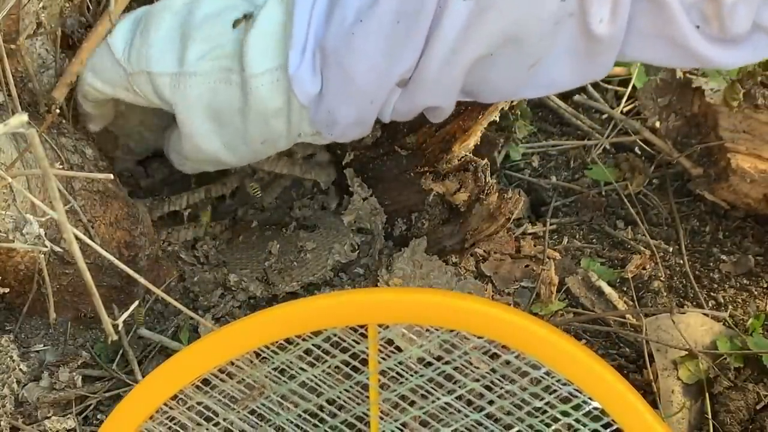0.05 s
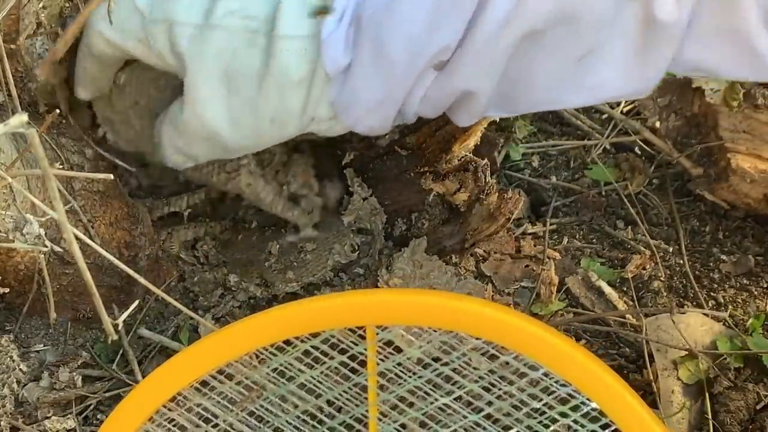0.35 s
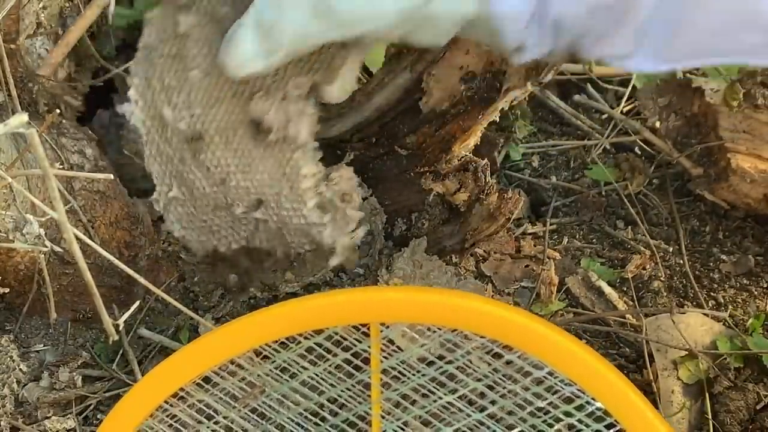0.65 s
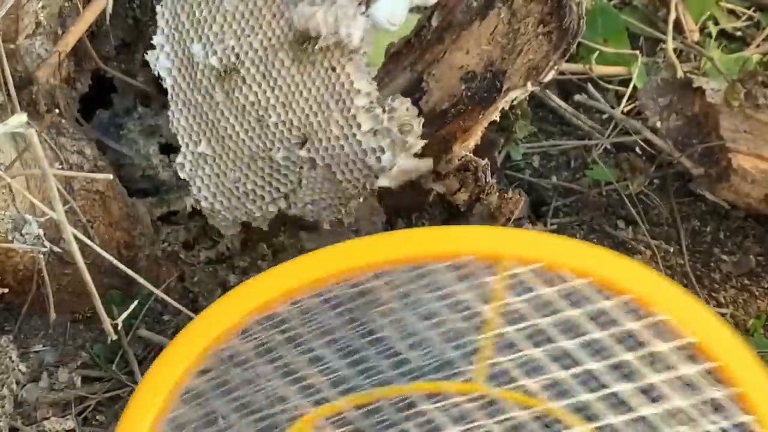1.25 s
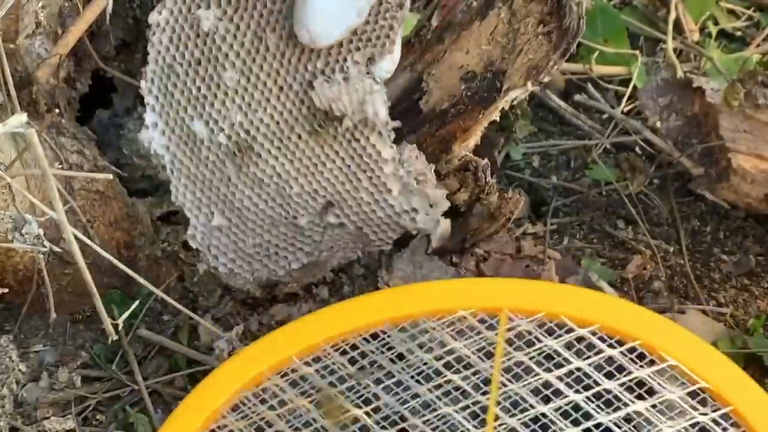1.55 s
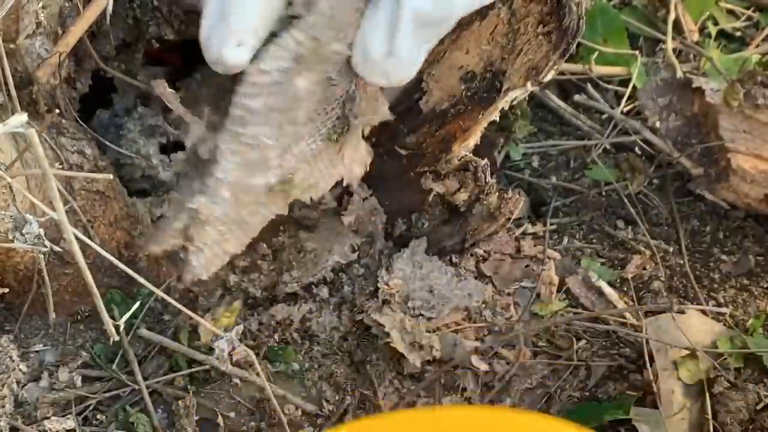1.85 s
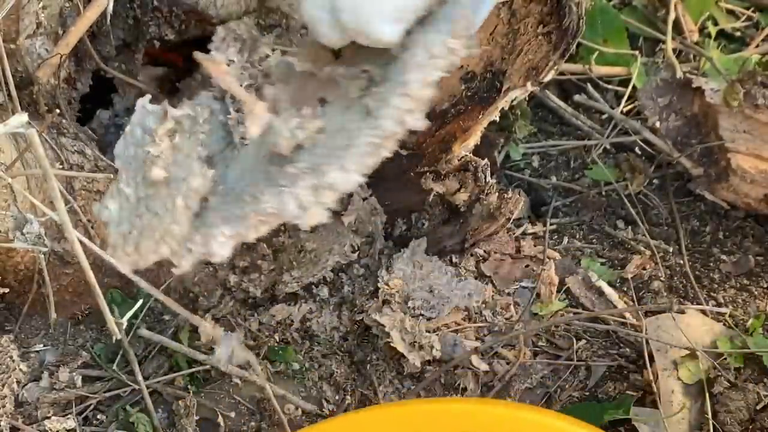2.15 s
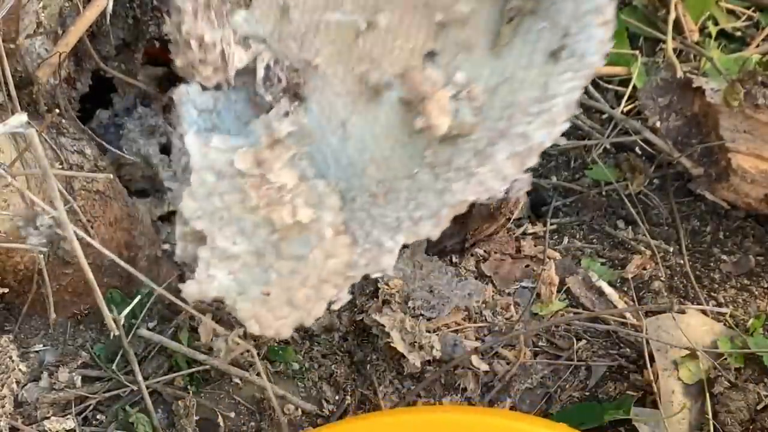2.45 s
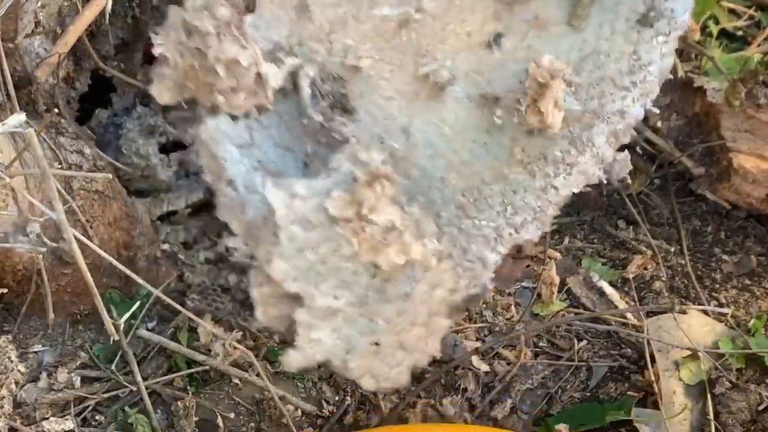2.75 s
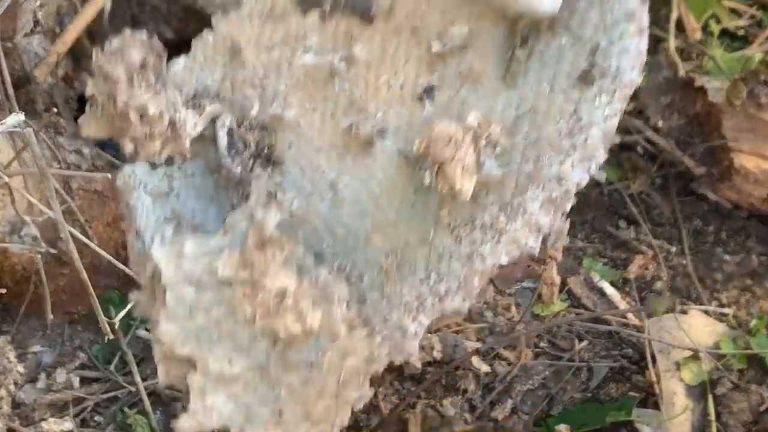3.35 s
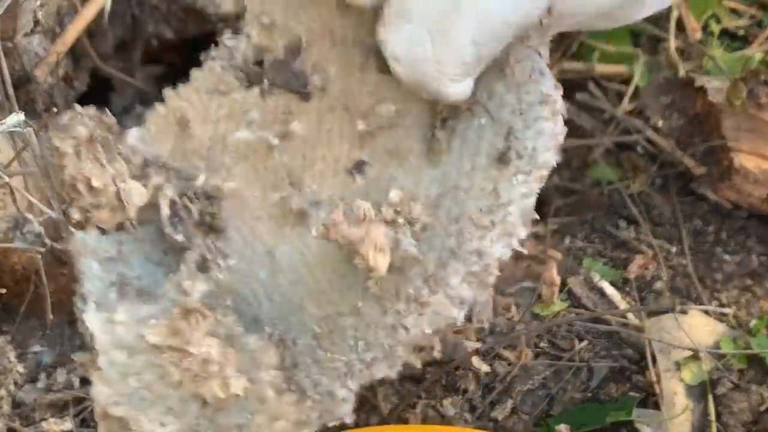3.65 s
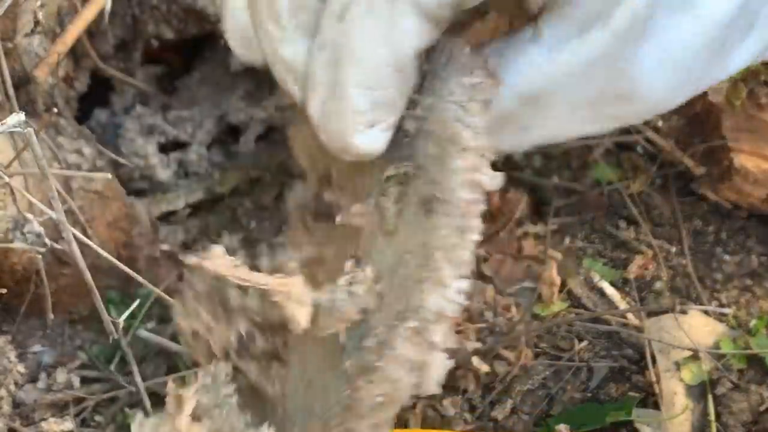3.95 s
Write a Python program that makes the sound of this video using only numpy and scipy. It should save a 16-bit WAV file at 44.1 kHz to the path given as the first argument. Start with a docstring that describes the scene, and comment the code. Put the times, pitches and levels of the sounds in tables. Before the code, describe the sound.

Low buzzing of many wasps outdoors, with close rustles and cracks of their handled paper nest.

```python
"""A paper wasp comb, close to the microphone, as a gloved hand pulls it from a hollow stump and turns it over.
Its dry fibres rustle and crack, and the glove scrapes and squeaks on it. Around it the wing beats of
many wasps drone, ring in the hollow and swell as the comb moves; more wasps hum farther off.
Behind them lie a deep rumble, soft air and a faint, distant bird.
The stereo microphone's two ports hear the paper a moment apart, the right one first."""
import sys
import numpy as np
from scipy import signal
from scipy.fft import rfft, irfft
from scipy.io import wavfile

SR = 44100
rng = np.random.default_rng(int(sys.argv[2]) if len(sys.argv) > 2 else 0)


def generate_wav(sig):
    """Save sig (samples, or channels by samples) to the path in sys.argv[1] as 16-bit PCM at SR."""
    pcm = np.round(np.clip(np.atleast_2d(sig).T, -1, 1) * 32767).astype(np.int16)
    wavfile.write(sys.argv[1], SR, pcm)


N = 176400
T = np.arange(N) / SR
HZ = np.fft.rfftfreq(N, 1 / SR)

# Rumble and air around the stump (time [s], level [dB])
RUMBLE_LEVEL = [(0,-32.5),(2.2,-31.5),(2.6,-33.5)]
AIR_LEVEL = [(0,-52.5),(.55,-48.5),(.78,-54),(.97,-50),(1.7,-48.5),(2.5,-53.5),(3.97,-52)]
# Their spectra (frequency [Hz], relative level [dB])
RUMBLE_COLOUR = [(8,-36),(20,-3),(42,-9),(62,3.5),(105,-8.5),(190,-25),(300,-31),(700,-79.5)]
AIR_COLOUR = [(60,-23.5),(200,2),(350,2),(750,-7.5),(1300,-16.5),(4000,-38),(16000,-58)]
# Notes of a distant bird (time [s], length [s], pitch [Hz], level [dB])
BIRD_NOTES = [(2.76,.16,2580,-72.5),(2.8,.07,2950,-75),(2.93,.06,2560,-70),(2.995,.055,2760,-71)]

# Wasps farther off (time [s], level [dB])
FAR_HUM_LEVEL = [(0,-83),(1.38,-95),(1.54,-49.5),(1.8,-55.5),(2.5,-68.5),(3.0,-54.5),(3.3,-52),(3.97,-58.5)]
# Wasps at the stump (time [s], hollow hum level [dB], low hum level [dB])
NEAR_HUM_LEVELS = [(0,-60,-53.5),(.2,-51.5,-51.5),(.33,-63,-53.5),(.48,-45,-45),(.64,-50.5,-47.5),(.82,-56.5,-50),(.93,-44.5,-52),(1.02,-42,-50),(1.12,-53,-46.5),(1.33,-55.5,-47),(1.55,-47.5,-41),(1.74,-43,-43.5),(1.99,-47.5,-43),(2.14,-53.5,-48),(2.58,-66.5,-48.5),(3.97,-75,-48)]
# Spectra of the far, low and hollow hums (frequency [Hz], relative level [dB])
FAR_HUM_COLOUR = [(250,-26),(450,4),(770,2.5),(990,-1.5),(1200,-20.5),(2500,-51)]
LOW_HUM_COLOUR = [(100,-38.5),(195,-20),(235,5),(298,4.5),(365,-5),(560,-29.5),(1500,-62)]
HOLLOW_HUM_COLOUR = [(300,-45),(560,-17.5),(690,-2),(785,-5),(870,-23.5),(1200,-40),(2500,-52)]
# The hollow's resonance, sinking as the comb comes out (time [s], frequency [Hz])
HOLLOW_RESONANCE = [(.7, 700), (1.3, 674)]

# Glove rubs that ring a patch of comb (time [s], length [s], resonance [Hz], width [Hz], level [dB])
GLOVE_RUBS = [(0.185,.09,7900,1100,-53.5),(0.44,.055,4200,220,-62.5),(0.955,.06,3000,1800,-71),(1.13,.075,4700,2400,-61),(1.22,.07,4700,2000,-61),(2.305,.055,4700,900,-74),(3.57,.045,1600,1300,-59),(3.885,.04,4400,1800,-67)]
# Glove scrapes on the paper (time [s], length [s], level [dB], body offset [dB])
GLOVE_SCRAPES = [(0.0,0.091,-52,-30),(0.165,0.21,-50,-13),(0.69,0.13,-50,-15.5),(0.912,.13,-48,-14.5),(1.772,0.23,-55,-12),(2.098,0.036,-51,-21),(2.156,0.13,-58.5,-15),(3.11,0.34,-58,-13.5),(3.567,0.055,-51.5,-16),(3.628,0.11,-60,-15.5),(3.884,0.057,-70,-5)]
# Steady rustle, close up (time [s], snap level [dB], body drive [dB])
RUSTLE_LEVELS = [(0.0,-42,-57.5),(0.13,-59.5,-69.5),(0.34,-53.5,-66),(0.87,-55.5,-74.5),(1.02,-53.5,-67.5),(1.35,-63,-74.5),(2.09,-64.5,-71),(2.46,-70,-85),(2.55,-64,-73.5),(2.8,-78.5,-82),(3.03,-69,-74),(3.3,-74,-74.5),(3.53,-74,-84),(3.97,-72.5,-84.5)]
# Cracks of the comb (time [s], strength [dB], knock offset [dB], ring [Hz])
COMB_CRACKS = [(0.0144,-45,7,1300),(0.1394,-50,-3,3300),(0.2745,-46,5,1250),(0.2835,-32,-14,3000),(0.585,-39,-20,3000),(0.7362,-39,-2,2700),(0.7474,-38,-14,4500),(0.781,-31,-11,4400),(0.9455,-42,2,1150),(0.9825,-41,-4,3300),(1.0685,-41,-16,3000),(1.284,-40,-18,4000),(1.806,-49,-4,4400),(1.8675,-35,1,1750),(1.9298,-39,-13,2500),(2.1155,-34,-11,2300),(2.5135,-43,-16,4200),(2.542,-43,-18,4000),(2.551,-30,-23,3700),(2.6054,-38,-21,4500),(2.689,-46,-16,4000),(2.8275,-49,-22,4000),(2.9212,-49,-14,4000),(2.9652,-48,-17,4000),(3.032,-45,-12,2800),(3.197,-38,-20,3000),(3.2728,-39,-22,4000),(3.3189,-33,-11,5800),(3.461,-40,-14,5200),(3.5925,-39,-3,1150),(3.6729,-31,-24,3000)]
# Spectra of fibre snaps, the paper's body and crack bursts (frequency [Hz], relative level [dB])
SNAP_COLOUR = [(1000, -44), (4000, -15), (6800, -8.5), (8400, 1), (10500, -3), (12500, 1.5), (14300, 7.5),
               (15100, -3), (16000, -27)]
BODY_COLOUR = [(200,-38),(700,12),(1400,10.5),(2300,8.5),(4400,5),(6500,6.5),(10000,-25)]
BURST_COLOUR = [(1500, -46), (5000, -22), (8500, -1.5), (12000, 5), (14500, 9), (16000, -16)]


def amp(db):
    """Decibels to gain."""
    return 10 ** (np.asarray(db) / 20)


def unit(x):
    """Scales to rms 1."""
    return x / np.sqrt(np.mean(x ** 2) + 1e-20)


def curve(table, column=1):
    """Gain over time from one dB column of a table."""
    rows = np.array(table)
    return amp(np.interp(T, rows[:, 0], rows[:, column]))


def colour(x, points):
    """Causal filter of unit power gain with the given spectrum."""
    hz, db = np.transpose(points)
    gain = unit(amp(np.interp(np.log(HZ + 1), np.log(hz), db)))
    log_gain = np.log(np.concatenate([gain, gain[-2:0:-1]]))
    minimum_phase = np.exp(np.conj(signal.hilbert(log_gain)))[:len(HZ)]
    return irfft(rfft(x) * minimum_phase, N)


def drift(hz):
    """Random wander of rms 1, up to about the given rate."""
    return unit(irfft(rfft(rng.standard_normal(N)) * np.exp(-(HZ / hz) ** 2), N))


def resonate(x, hz, width_hz):
    """A resonance of gain 1 that can follow a curve."""
    turn = np.exp(2j * np.pi * np.cumsum(hz * np.ones(x.shape[-1])) / SR)
    pole = np.exp(-np.pi * width_hz / SR)
    return 2 * (turn * signal.lfilter([1 - pole], [1, -pole], x / turn)).real


def add(mix, start, sound):
    """Mixes a sound in at a time in seconds."""
    part = mix[max(round(start * SR), 0):][:len(sound)]
    part += sound[:len(part)]


def spread(mid, side, width, left_db):
    """A stereo pair from a shared and an opposed part."""
    return unit(np.array([(mid + width * side) * amp(left_db), mid - width * side]))


def ports(x, delay_s=.000259):
    """Sound from the comb reaches the microphone's right port first."""
    left = irfft(rfft(x) * np.exp(-2j * np.pi * HZ * delay_s), N)
    return np.array([left, x])


def ground_scatter(x, decay_s=0.0079):
    """Brief reflections off the stump and the litter, different at each port."""
    t = np.arange(SR // 8) / SR
    taps = rng.standard_normal((2, len(t))) * np.exp(-t / decay_s) * (t > .002)
    return signal.fftconvolve(x[None], taps / np.linalg.norm(taps[0]), axes=1)[:, :N]


def outdoors():
    """The bed of the place: a deep rumble, nearly alike at both ports, and wide, soft air."""
    noise = rng.standard_normal((4, N))
    rumble = unit(colour(spread(*noise[:2], width=0.053, left_db=0.25), RUMBLE_COLOUR))
    air = colour(spread(*noise[2:], width=1.26, left_db=1.5), AIR_COLOUR)
    flutter = amp(1.3 * drift(25))
    return rumble * curve(RUMBLE_LEVEL) + air * flutter * curve(AIR_LEVEL)


def bird(blur_hz=200):
    """Twittering whistles, blurred by distance."""
    out = np.zeros(N)
    for start, length, hz, db in BIRD_NOTES:
        progress = np.clip((T - start) / length, 0, 1)
        phase = 2 * np.pi * hz * T
        whistle = unit(drift(blur_hz) * np.cos(phase) + drift(blur_hz) * np.sin(phase))
        out += amp(db) * np.sqrt(abs(np.sin(np.pi * progress))) * whistle
    return out * unit(amp(0.83 * drift(37)))


def wings(count=7, centre_hz=106.48, detune=.14, wander=.025, roughness=0.35):
    """Several wasps, each a wavering train of wing beats with a puff of air on every beat."""
    out = np.zeros(N)
    for offset in np.linspace(-1, 1, count):
        hz = centre_hz * (1 + detune * offset + wander * drift(5) + 0.01982 * drift(59.14))
        turns = np.cumsum(hz) / SR + rng.random()
        beats = unit(np.diff(np.floor(turns), prepend=0))
        puffs = unit(np.exp(-(turns % 1) / 0.22) * rng.standard_normal(N))
        out += (beats + roughness * puffs) * amp(2.94 * drift(8.2))
    return unit(out - out.mean())


def swarm(ring_db=5):
    """Wing beats drone nearby on the left, ring in the hollow, and hum farther off on the right."""
    mid, side = wings(), wings()
    low = colour(spread(mid, side, width=0.21, left_db=6.5), LOW_HUM_COLOUR)
    inside = spread(mid, side, width=0.37, left_db=-0.5)
    hollow_hz = np.interp(T, *np.transpose(HOLLOW_RESONANCE))
    ring = resonate(inside, hollow_hz, width_hz=15.3)
    hollow = colour(inside + amp(ring_db) * ring, HOLLOW_HUM_COLOUR)
    far = colour(spread(wings(), wings(), width=0.67, left_db=-4), FAR_HUM_COLOUR)
    near = unit(low) * curve(NEAR_HUM_LEVELS, column=2) + unit(hollow) * curve(NEAR_HUM_LEVELS)
    return near + unit(far) * curve(FAR_HUM_LEVEL)


def fibres(per_s, size_db, clump_db):
    """Tiny snaps of paper fibres, uneven in size and swelling in clumps."""
    sizes = amp(size_db * np.minimum(rng.exponential(1, N), 4)) * rng.choice([-1, 1], N)
    breaks = rng.random(N) < per_s / SR
    return unit(sizes * breaks * amp(clump_db * drift(49)))


def rubs():
    """Slips of the glove excite one patch of the comb at a time; a narrow resonance squeaks."""
    slips = np.array([fibres(per_s=3000, size_db=3, clump_db=1.5) for _ in range(2)])
    out = np.zeros((2, N))
    for start, length, hz, width_hz, db in GLOVE_RUBS:
        span = slice(round(start * SR), round((start + length) * SR))
        mid, side = resonate(resonate(slips[:, span], hz, width_hz), hz, width_hz)
        arch = np.sin(np.linspace(0, np.pi, len(mid)))
        out[:, span] += amp(db) * arch * spread(mid, side, width=0.6, left_db=0)
    return out


def scrapes(skew=0.83):
    """Envelopes of the glove's scrapes: each a quick swell and a slower fall."""
    snap, body = np.zeros((2, N))
    for start, length, db, body_db in GLOVE_SCRAPES:
        arch = np.sin(np.pi * np.linspace(0, 1, round(length * SR)) ** skew)
        add(snap, start, amp(db) * arch)
        add(body, start, amp(db + body_db) * arch)
    return snap, body


def crinkles(count=11, decay_cycles=1.28):
    """Cell walls of many sizes buckle in clumps, each ringing briefly, so the colour keeps shifting."""
    t = np.arange(SR // 80) / SR
    out = np.zeros(N)
    for hz in np.geomspace(1000, 7500, count):
        clicks = fibres(per_s=450, size_db=4.2, clump_db=3.5)
        ring = np.sin(2 * np.pi * hz * t) * np.exp(-t * hz / decay_cycles)
        out += np.sqrt(hz) * unit(signal.oaconvolve(clicks, ring)[:N])
    return unit(out)


def rustle():
    """Handled paper, close up: the bright snap arrives mostly direct, the duller body mostly scattered."""
    scrape_snap, scrape_body = scrapes()
    grain = fibres(per_s=5000, size_db=5, clump_db=2.5)
    snap = colour(grain * np.hypot(curve(RUSTLE_LEVELS), scrape_snap), SNAP_COLOUR)
    body = colour(crinkles() * np.hypot(curve(RUSTLE_LEVELS, column=2), scrape_body), BODY_COLOUR)
    return ports(snap + amp(-6.5) * body) + ground_scatter(amp(-9) * snap + amp(2.5) * body)


def cracks(snap_s=0.00069, crumble_s=.01, crumble_db=-19, ring_s=.0009):
    """Fibres break in a bright burst and crumble on; a woody, ringing knock hits both ports alike."""
    snap, knock, ring = np.zeros((3, N))
    t = np.arange(SR // 10) / SR
    burst = np.exp(-t / snap_s) + amp(crumble_db) * np.exp(-t / crumble_s)
    for start, db, knock_db, hz in COMB_CRACKS:
        onset = start + .001
        knock_gain = amp(db + knock_db - 2)
        add(snap, onset, amp(db - 1) * burst)
        add(knock, onset, knock_gain * burst)
        add(ring, onset, knock_gain * np.sin(2 * np.pi * hz * t) * np.exp(-t / ring_s))
    bright = colour(snap * rng.standard_normal(N), BURST_COLOUR)
    woody = ring + amp(-2.5) * colour(knock * rng.standard_normal(N), BODY_COLOUR)
    return ports(bright) + woody + amp(-10) * ground_scatter(bright + woody)


def scene():
    """Everything that reaches the microphone beside the stump."""
    return outdoors() + swarm() + rustle() + rubs() + cracks() + bird()


def record(dry, edge_hz=16100):
    """The recorder's band limit cuts off the highest treble."""
    lowpass = signal.firwin(511, edge_hz, window=("kaiser", 9), fs=SR)
    return signal.oaconvolve(dry, lowpass[None], "same")


dry = scene()
out = record(dry)
generate_wav(out)
```